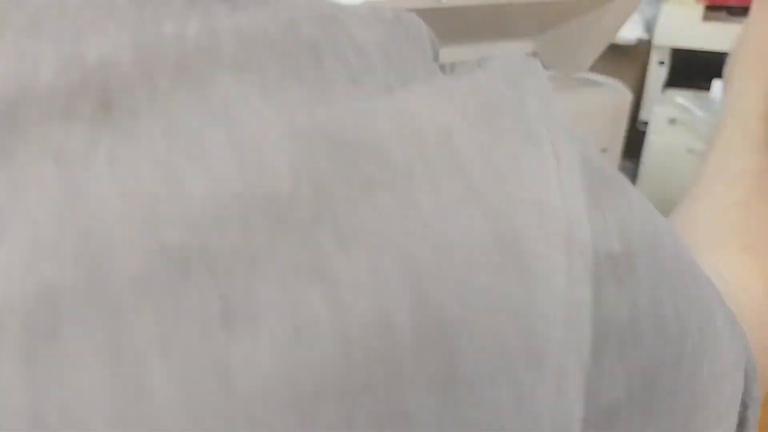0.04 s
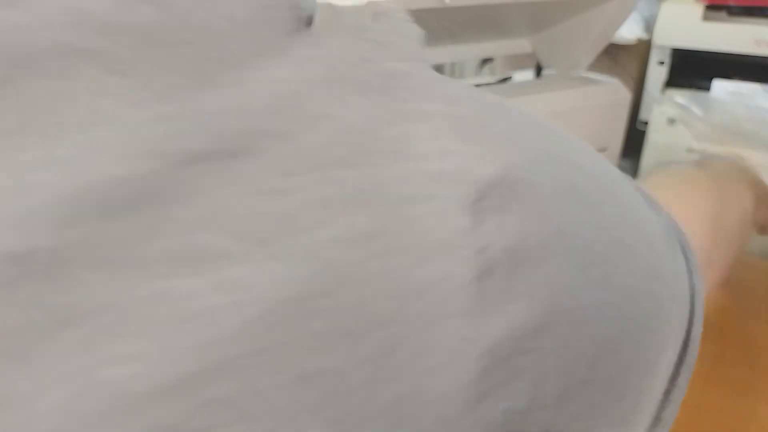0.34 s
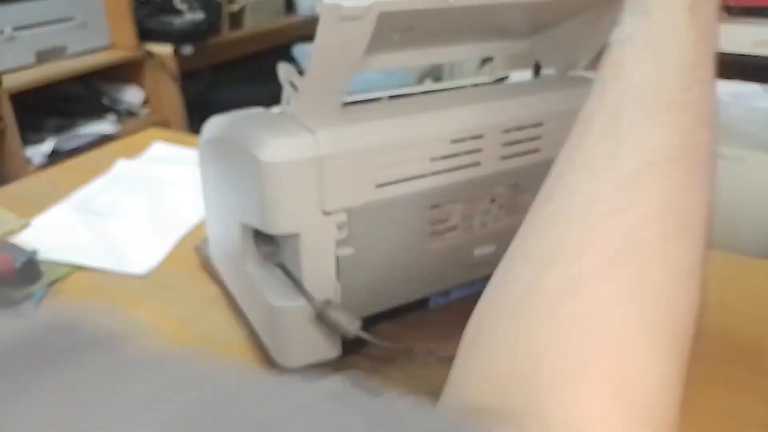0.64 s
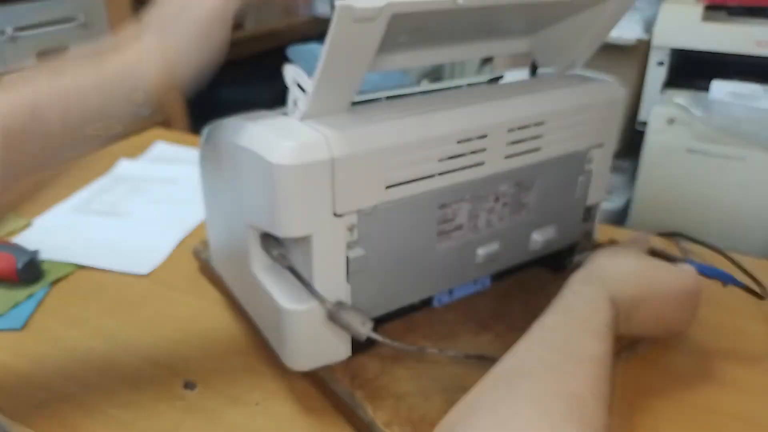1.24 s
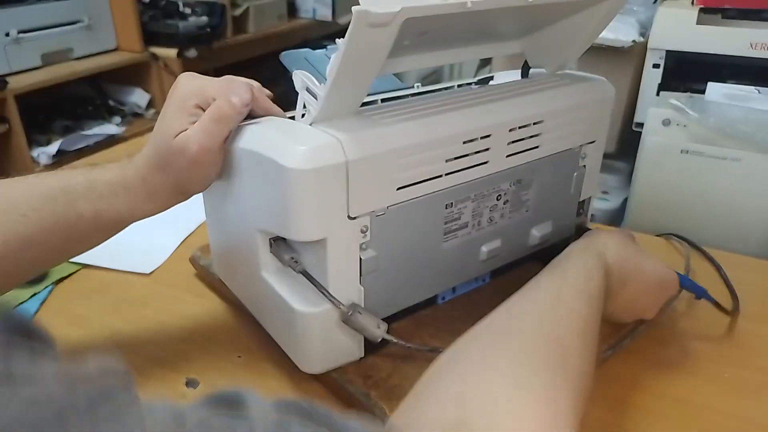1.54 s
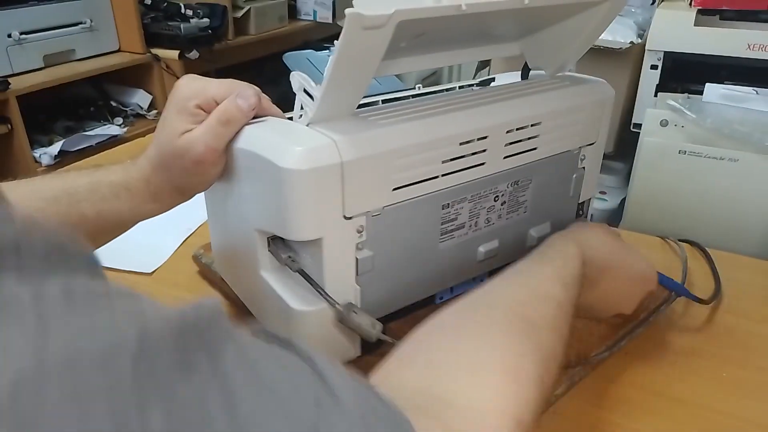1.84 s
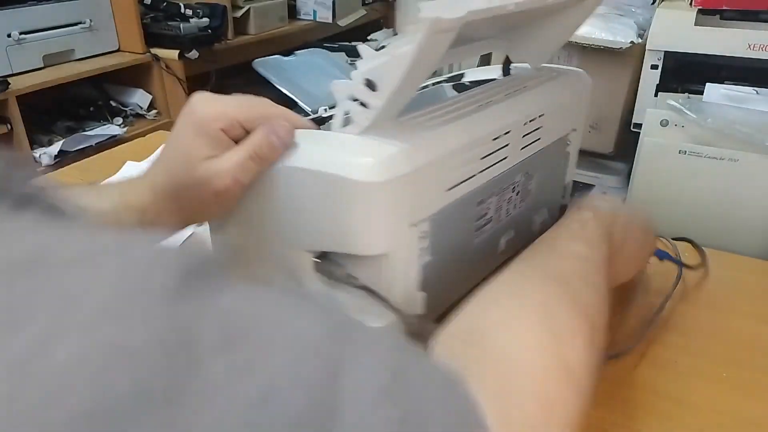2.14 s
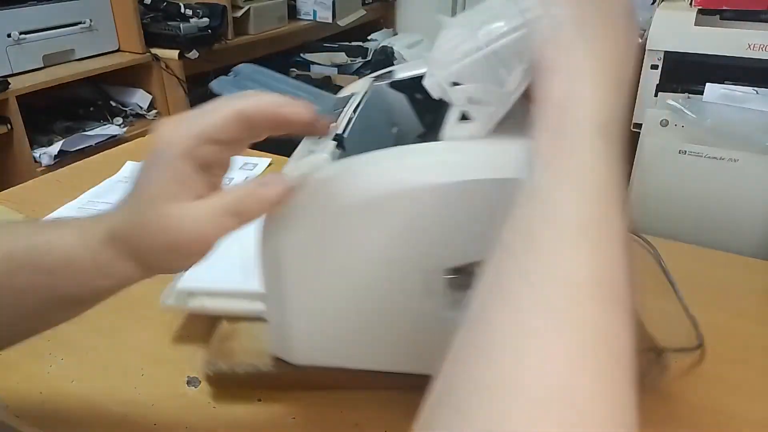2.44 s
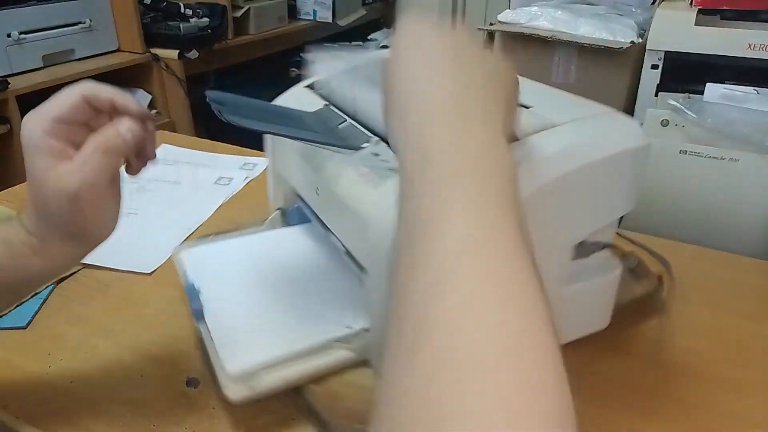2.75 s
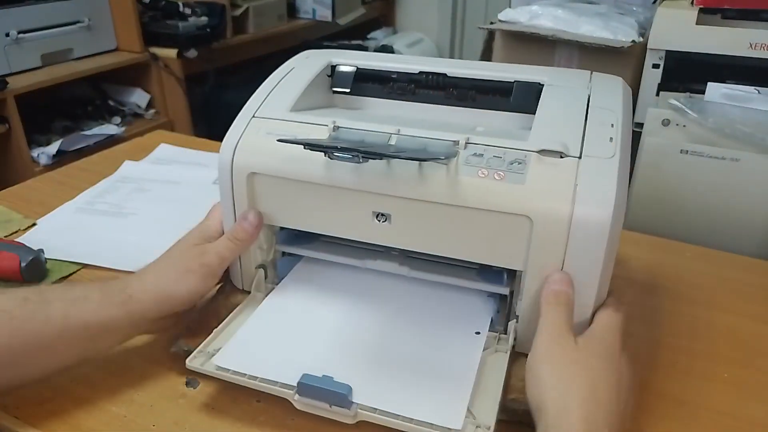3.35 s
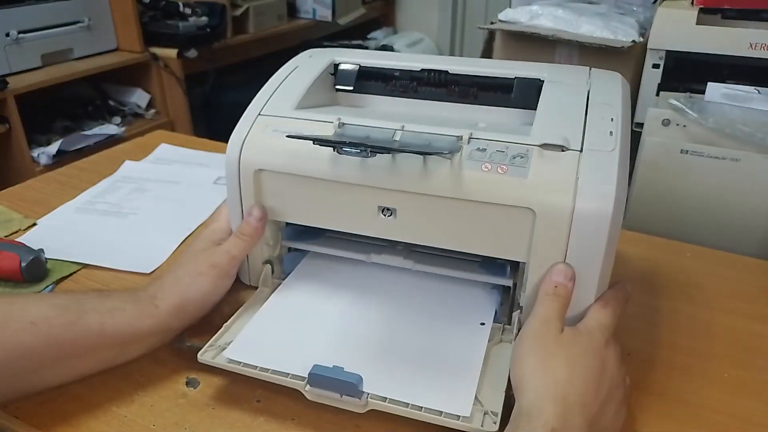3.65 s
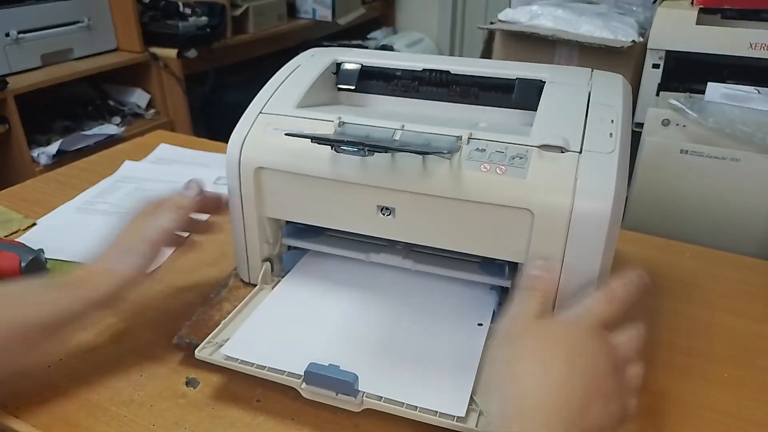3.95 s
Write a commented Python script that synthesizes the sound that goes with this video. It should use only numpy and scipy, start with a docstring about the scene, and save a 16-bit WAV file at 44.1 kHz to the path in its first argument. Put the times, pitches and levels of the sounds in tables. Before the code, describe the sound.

Close up in a small room, a printer's plastic case knocks and scrapes softly on a desk while hands and cloth rub against it. Its lid unlatches with a click and slams sharply, then light taps follow.

```python
"""Turning a printer on a desk

A plastic printer is turned round on a wooden desk in a small room, close to the microphone.
Friction makes sleeves and hands swish and the feet scrape; impacts make the case bump and tick.
The open lid is unlatched and clacks shut, and its shell rings on in damped modes.
The microphone is thin in the bass and peaks near 9 kHz."""
import sys
import numpy as np
from scipy import signal
from scipy.fft import rfft, irfft, next_fast_len
from scipy.io import wavfile
from scipy.ndimage import map_coordinates

SR = 44100
rng = np.random.default_rng(int(sys.argv[2]) if len(sys.argv) > 2 else 0)


def master(y):
    """Save y as 16-bit WAV."""
    cut = np.clip(np.atleast_2d(y).T, -1, 1)
    pcm = np.round(cut * 32767)  # scale
    wavfile.write(sys.argv[1], SR, pcm.astype(np.int16))


N = 176400

# Spectra of the sources and the microphone. Each row: frequency in Hz, relative level in dB.
FLOOR_SPECTRUM = [(24, -14), (42, 10.5), (160, -9.5), (300, -0.5), (3000, -9), (15000, -35.5)]
CLOTH_SPECTRUM = [(200, -8.5), (900, -3.5), (3500, -8), (9500, 0), (15500, -4)]
BODY_SPECTRUM = [(25, -42.5), (170, -25.5), (235, 1.5), (650, 1.5), (1000, 0), (2500, -45.5)]
PANEL_SPECTRUM = [(300, -21), (800, -4.5), (1400, 1.5), (2200, -2.5), (3300, -1), (5000, -8), (9000, -20)]
EDGE_SPECTRUM = [(1500, -29.5), (3500, -5), (5500, -5.5), (8000, -4.5), (10500, -9), (12500, -6.5),
                 (15500, -16.5)]
LID_BODY_SPECTRUM = [(40, -41.5), (90, -15.5), (170, -26.5), (330, 2), (600, 0.5), (1500, -34.5)]
LID_PANEL_SPECTRUM = [(300, -36.5), (800, -6), (1300, 2.5), (2000, 0), (3200, 0.5), (5000, -13.5),
                      (9000, -5)]
MIC_RESPONSE = [(20, 2), (150, -8.5), (250, -3.5), (6500, -0.5), (7800, 1.5), (9000, 9), (10200, 2.5),
                (11500, -3), (14200, -6), (15400, -5)]
# Resonances of the plastic parts. Each row: centre in Hz, width in Hz, relative level in dB.
SQUEAK_BANDS = [(1411, 110, 0), (2530, 48, -10), (4350, 130, -6), (5085, 150, -12), (6070, 290, -1),
                (7055, 132, 5.5), (8490, 180, -7.5), (9610, 300, -7)]
CASE_BANDS = [(243, 43, 2), (384, 55, -0.5), (578, 101, 3), (879, 65, -8), (1418, 76, -6)]
FLAP_BANDS = [(1580, 150, 3), (5030, 200, -7)]
TRAY_BANDS = [(2007, 190, 2), (2424, 360, -0.5), (3810, 210, 0)]
INNER_BANDS = [(381, 56, 0)]
LATCH_BANDS = [(3200, 570, 0), (5660, 500, -2), (7550, 1100, -0.5), (10700, 580, -4.5)]
# Modes of desk top and lid. Each row: frequency in Hz, relative level in dB, t60 in seconds.
DESK_MODES = [(101, -12.5, 0.19), (251, 1.5, 0.13)]
SHELL_MODES = [(344, -3.5, 0.23), (443.2, -1, 0.23), (842, -1.5, 0.21), (1300, -0.5, 0.21),
               (2610, -6.5, .17), (2915, -1, 0.16)]
# Reverberation of the room. Each row: frequency in Hz, t60 in seconds.
ROOM_DECAY = [(100, 0.79), (400, 0.46), (6000, 0.29)]
# Strokes of cloth and hands. Each row: middle, rise, hold and release in seconds,
# relative level and singing in dB, treble slope in dB per octave.
RUB_STROKES = [(0.074, .1, 0.12, 0.12, -42, 6.5, -0.5), (.36, 0.018, 0.13, 0.11, -42.5, 6, -1),
               (0.524, 0.089, 0.086, 0.15, -44.5, 4, -5), (0.887, 0.14, 0.022, 0.24, -44.5, 7, 1.5),
               (1.229, 0.11, 0.048, 0.074, -33, 5.5, 0.5), (1.535, 0.023, 0.072, 0.12, -46, 19, -4),
               (1.665, 0.075, 0.04, 0.11, -51, 7, -5.5), (1.895, 0.031, 0.046, 0.22, -51.5, 7, -3),
               (2.313, 0.069, 0.087, 0.14, -45.5, 11, -0.5), (2.799, 0.11, 0.12, 0.37, -39, -1.5, -2.5),
               (3.432, 0.057, 0.17, 0.05, -53.5, 12, 4.5), (3.681, 0.06, 0.13, 0.34, -55, 2, -2.5),
               (3.945, 0.11, 0.11, .2, -37, 10.5, 5)]
# Feet drag; inner parts shudder after the slam. Each row: middle and hold in seconds, level in dB.
FOOT_DRAGS = [(0.069, 0.027, -57.5), (0.835, 0.015, -56), (1.016, 0.031, -47), (1.13, 0.022, -47),
              (1.738, 0.016, -48), (2.36, 0.13, -56), (2.479, 0.05, -50.5), (2.816, 0.024, -48.5)]
INNER_SHUDDERS = [(3.068, 0.052, -51.5), (3.23, 0.038, -58)]
# Clicks of plastic and cable. Each row: start in seconds, level in dB, centre in Hz, t60 in seconds.
LIGHT_TICKS = [(.23, -43.5, 8500, 0.028), (0.252, -48, 8900, 0.11), (.941, -36.5, 11800, 0.07),
               (1.951, -31.5, 14800, 0.047), (2.132, -50.5, 11100, 0.069), (2.336, -37, 8600, 0.069),
               (1.631, -48, 3500, .04), (2.869, -34, 6900, 0.071), (3.1, -38.5, 9000, 0.14),
               (3.329, -46.5, 10070, 0.076), (3.385, -46, 9900, 0.28), (3.469, -44, 9160, 0.13)]
# Taps on the paper tray; thuds on the desk. Each row: start in seconds, level in dB.
PAPER_TRAY_TAPS = [(3.699, -48), (3.754, -43)]
DESK_THUDS = [(0.0, -30.5), (3.926, -43.5)]
# Bumps on the case. Each row: start in seconds, body, panel and edge levels in dB, panel centre in Hz.
CASE_BUMPS = [(0.0, -32.5, -32.5, -43, 1280), (0.131, -55, -42.5, -65, 1010), (.301, -31, -30, -54, 1260),
              (.378, -43, -42.5, -34, 1490), (.466, -42.5, -37.5, -33, 1540), (.63, -81, -46, -48.5, 1700),
              (.956, -37, -35.5, -52, 1103), (1.448, -47, -51, -56.5, 1190), (1.52, -39.5, -38, -49, 1260),
              (1.772, -53, -40, -54, 1010), (1.983, -53, -50, -79, 896), (2.787, -50, -42, -38.5, 1450),
              (2.886, -51, -38.5, -40.5, 1700), (3.698, -52, -49, -46.5, 1600)]
# Contacts of the closing lid. Each row: start in seconds, body, panel and edge levels in dB.
LID_CONTACTS = [(2.907, -26, -17, -10), (2.913, -34, -19, -10.5), (2.924, -26.5, -17, -21),
                (2.932, -26.5, -26, -15.5), (2.944, -30.5, -20, -27)]


def amp(db):
    """Amplitude grows tenfold for every 20 dB."""
    return 10 ** (np.asarray(db) / 20)


def unit(x):
    """Normalisation to rms 1."""
    return x / np.sqrt(np.mean(x ** 2) + 1e-20)


def along(points, hz):
    """Interpolation of (Hz, value) points on a logarithmic frequency axis."""
    f, v = np.transpose(points)
    return np.interp(np.log(hz + 1), np.log(f + 1), v)


def filtered(x, response):
    """Linear filtering multiplies the spectrum by a frequency response."""
    size = next_fast_len(len(x) + 8192)
    return irfft(rfft(x, size) * response(np.fft.rfftfreq(size, 1 / SR)), size)[:len(x)]


def noise(spectrum, size=SR):
    """Filtering colours white noise; rms 1."""
    return unit(filtered(rng.standard_normal(size), lambda hz: amp(along(spectrum, hz))))


def resonances(bands, hz):
    """Superposition of second-order resonators of alternating sign."""
    return sum((-1) ** k * amp(db) * 1j * hz * w / (c * c - hz * hz + 1j * hz * w)
               for k, (c, w, db) in enumerate(bands))


def peaks(bands, hz):
    """Squared resonance curves sum to a gain with steep-sided peaks."""
    return sum(amp(db) * (hz * w) ** 2 / ((c * c - hz * hz) ** 2 + (hz * w) ** 2) for c, w, db in bands)


def buzz(bands):
    """Resonances driven by noise ring roughly; one second, rms 1."""
    return unit(filtered(rng.standard_normal(SR), lambda hz: peaks(bands, hz)))


def ribbed(x, depth_db, spacing_hz=60.56):
    """Each spot on the plastic favours its own set of close resonances; rms 1."""
    knots = rng.standard_normal(2048)
    ripple = lambda hz: np.tanh(map_coordinates(knots, [hz / spacing_hz], mode="wrap"))
    return unit(filtered(x, lambda hz: amp(depth_db * ripple(hz))))


def fade(t60, attack):
    """Damping gives exponential decay after a quick rise; one second."""
    t = np.arange(SR) / SR
    return (1 - np.exp(-t / attack)) * np.exp(-np.log(1000) * t / t60)


def swell(rise, hold, release):
    """Envelope of a stroke centred in one second; rise and release each span 20 dB."""
    t = np.arange(SR) / SR - .5
    return amp(-20 * (np.maximum(-t - hold / 2, 0) / rise + np.maximum(t - hold / 2, 0) / release))


def ring(modes, attack):
    """Free vibration is a sum of damped sines, here with random phases."""
    t = np.arange(SR) / SR
    return sum(amp(db) * fade(t60, attack) * np.sin(2 * np.pi * (hz * t + rng.random()))
               for hz, db, t60 in modes)


def wobble(rate):
    """Smooth interpolation of random knots, rate a second, for one second."""
    return map_coordinates(rng.standard_normal(1024), [np.arange(SR) * rate / SR], mode="wrap")


def slips(rate, spread_db):
    """Stick-slip friction gives tiny impulses at random times; one second, rms 1."""
    slipping = rng.random(SR) < rate / SR
    return unit(slipping * rng.standard_normal(SR) * amp(spread_db * rng.standard_normal(SR)))


def room(x, build_s=0.0062):
    """Reverberation is convolution with a noise tail, each frequency decaying at its own rate."""
    hz, t, spectra = signal.stft(rng.standard_normal(SR), SR, nperseg=256)
    decay = np.exp(-np.log(1000) * t / along(ROOM_DECAY, hz)[:, None])
    tail = signal.istft(spectra * decay, SR, nperseg=256)[1][:SR]
    tail *= 1 - np.exp(-np.arange(SR) / SR / build_s)
    return signal.fftconvolve(x, tail / np.linalg.norm(tail))[:N]


def dragging():
    """Stick-slip of the feet on wood drives the case's resonances into a groan."""
    out = np.zeros(N)
    for s, hold, db in FOOT_DRAGS:
        judder = slips(rate=770, spread_db=0.0) * amp(2.3 * wobble(35))
        groan = unit(filtered(judder, lambda hz: peaks(CASE_BANDS, hz)))
        add(out, s - .5, amp(db) * swell(1.4 * hold, hold, 2.34 * hold) * groan)
    return out


def rubbing(treble_hz=4500):
    """Friction of cloth and skin comes in dense grains; a gripping hand sets the plastic singing."""
    out = np.zeros(N)
    for s, rise, hold, release, db, singing_db, slope_db in RUB_STROKES:
        treble = lambda hz: amp(slope_db * np.log2(np.maximum(hz / treble_hz, 1)))
        singing = lambda hz: 1 + amp(singing_db) * peaks(SQUEAK_BANDS, hz)
        grains = slips(rate=16000, spread_db=1.0) * amp(1.6 * wobble(90.3))
        swish = filtered(grains, lambda hz: amp(along(CLOTH_SPECTRUM, hz)) * treble(hz) * singing(hz))
        add(out, s - .5, amp(db) * swell(rise, hold, release) * ribbed(swish, depth_db=6))
    return out


def loose_parts(flap_s=.378, flap_db=-36.5, scrape_s=3.78, scrape_hold_s=0.094, scrape_db=-58):
    """Loose parts resonate: a flap claps, inner parts shudder, the paper tray is tapped and scraped."""
    out = np.zeros(N)
    knock = fade(t60=0.11, attack=0.0013)
    add(out, flap_s, amp(flap_db) * buzz(FLAP_BANDS) * knock)
    for s, db in PAPER_TRAY_TAPS:
        add(out, s, amp(db) * buzz(TRAY_BANDS) * knock)
    scrape = (scrape_s, scrape_hold_s, scrape_db)
    for bands, moves in (INNER_BANDS, INNER_SHUDDERS), (TRAY_BANDS, [scrape]):
        for s, hold, db in moves:
            add(out, s - .5, amp(db) * buzz(bands) * swell(hold, hold, 2.34 * hold))
    return out


def ticks():
    """A brief, hard contact radiates a broad bright band that dies quickly."""
    out = np.zeros(N)
    for s, db, centre_hz, t60 in LIGHT_TICKS:
        octaves = lambda hz: np.abs(np.log2((hz + 1) / centre_hz))
        hump = lambda hz: amp(-11 * octaves(hz) ** 2 / (1 + 0.3 * octaves(hz)))
        band = filtered(rng.standard_normal(SR), hump)
        add(out, s, amp(db) * ribbed(band, depth_db=6.5) * fade(t60, attack=0.0018))
    return out


def thuds():
    """The printer's weight comes down and excites the low modes of the desk top."""
    out = np.zeros(N)
    for s, db in DESK_THUDS:
        add(out, s, amp(db) * ring(DESK_MODES, attack=0.0033))
    return out


def bumps(panel_hz=1400, damping_hz=2820):
    """An impact excites the case's body, panels and edges; damping ends a panel's treble early."""
    out = np.zeros(N)
    for s, body_db, panel_db, edge_db, centre_hz in CASE_BUMPS:
        hollow = unit(filtered(noise(BODY_SPECTRUM), lambda hz: resonances(CASE_BANDS, hz)))
        body = (hollow + 0.37 * noise(BODY_SPECTRUM)) * fade(t60=0.16, attack=0.0014)
        shifted = [(hz * centre_hz / panel_hz, db) for hz, db in PANEL_SPECTRUM]
        sheet = ribbed(noise(shifted), depth_db=2.0)
        mellow = unit(filtered(sheet, lambda hz: 1 / (1 + (hz / damping_hz) ** 4)))
        crack = 0.98 * sheet * fade(t60=0.042, attack=0.00062)
        panel = crack + mellow * fade(t60=0.14, attack=0.0051)
        edge = noise(EDGE_SPECTRUM) * fade(t60=0.16, attack=0.00028)
        add(out, s, amp(body_db) * body + amp(panel_db) * panel + amp(edge_db) * edge)
    return out


def lid(latch_s=2.685, latch_db=-24, ring_db=-25):
    """The catch snaps free; the lid slams in a cluster of impacts and rings on in free vibration."""
    out = np.zeros(N)
    catch = unit(filtered(rng.standard_normal(SR), lambda hz: resonances(LATCH_BANDS, hz)))
    catch += 0.1 * noise(EDGE_SPECTRUM)
    snap = fade(t60=0.043, attack=0.0021) + 0.39 * fade(t60=0.18, attack=0.00085)
    add(out, latch_s, amp(latch_db) * catch * snap)
    for s, body_db, panel_db, edge_db in LID_CONTACTS:
        body = amp(body_db) * noise(LID_BODY_SPECTRUM) * fade(t60=0.13, attack=0.0015)
        panel = amp(panel_db) * noise(LID_PANEL_SPECTRUM) * fade(t60=0.14, attack=0.00091)
        edge = amp(edge_db) * noise(EDGE_SPECTRUM) * fade(t60=0.099, attack=0.0019)
        add(out, s, body + panel + edge)
    second_contact_s = LID_CONTACTS[1][0]
    add(out, second_contact_s, amp(ring_db) * ring(SHELL_MODES, attack=.003))
    return out


def add(track, s, sound):
    """Superposition of a sound on the track, starting at s seconds."""
    start = round(s * SR)
    sound, start = sound[max(-start, 0):], max(start, 0)
    track[start:start + len(sound)] += sound[:N - start]


def scene():
    """Direct sound and reverberation add over a quiet noise floor."""
    blows = bumps() + thuds() + ticks() + loose_parts() + lid()
    friction = amp(-4.5) * rubbing() + dragging()
    reverberation = amp(-10.5) * room(blows + 0.52 * friction)
    floor = amp(-66.5) * noise(FLOOR_SPECTRUM, N)
    return (blows + friction + reverberation + floor)[None]


def record(dry, ceiling=.52, top_hz=15850):
    """The microphone colours the sound, saturates softly on the slam and limits the bandwidth."""
    coloured = filtered(dry[0], lambda hz: amp(along(MIC_RESPONSE, hz)))
    saturated = coloured / (1 + (coloured / ceiling) ** 4) ** .25
    return filtered(saturated, lambda hz: 1 / (1 + (hz / top_hz) ** 200))[None]


dry = scene()
out = record(dry)
master(out)
```